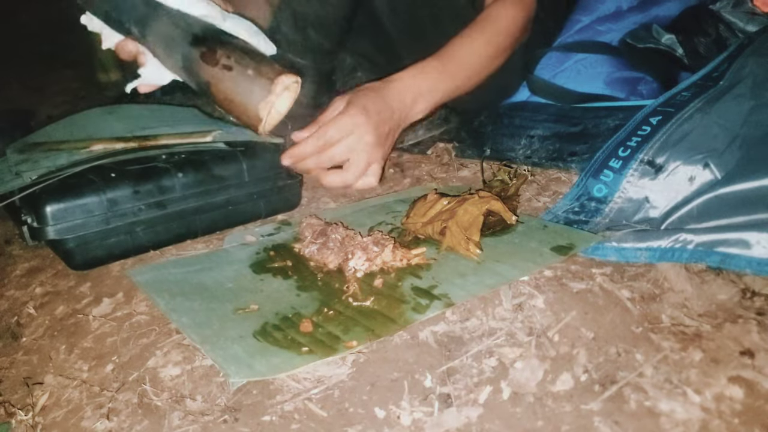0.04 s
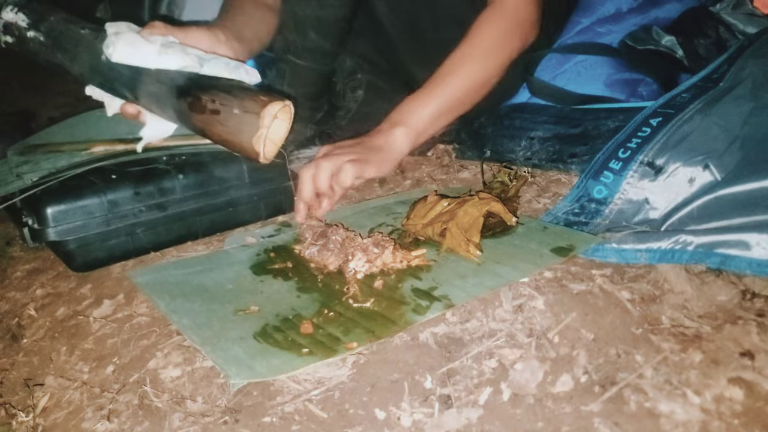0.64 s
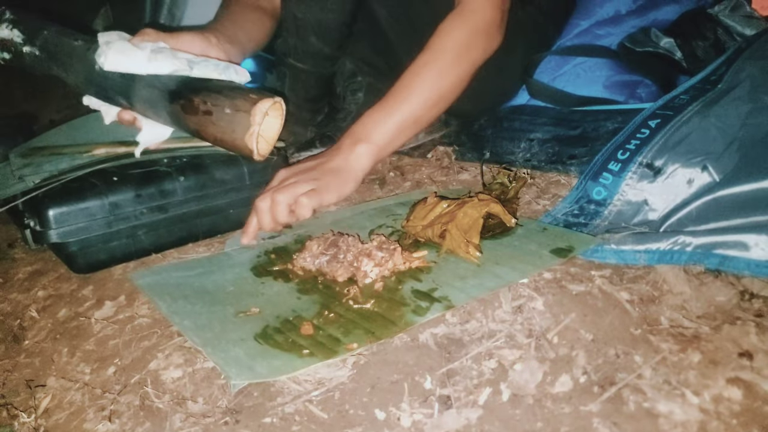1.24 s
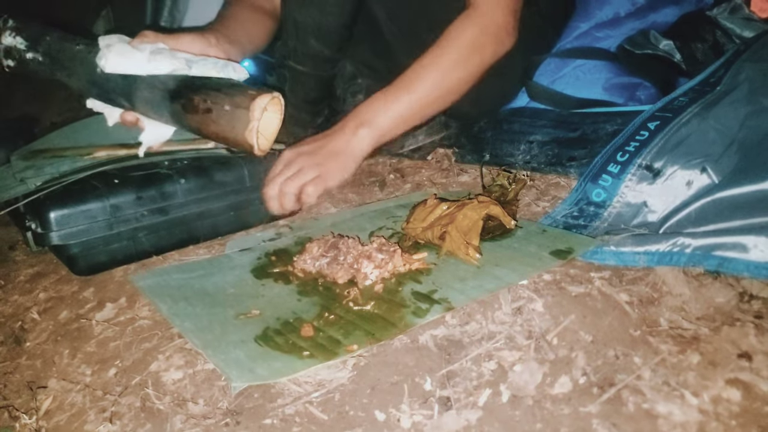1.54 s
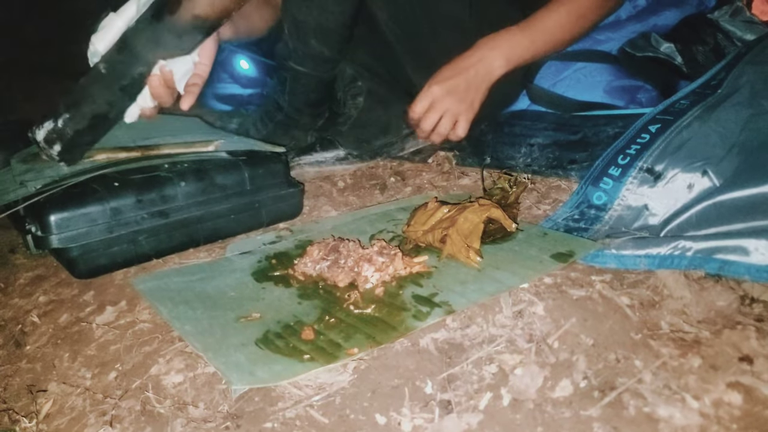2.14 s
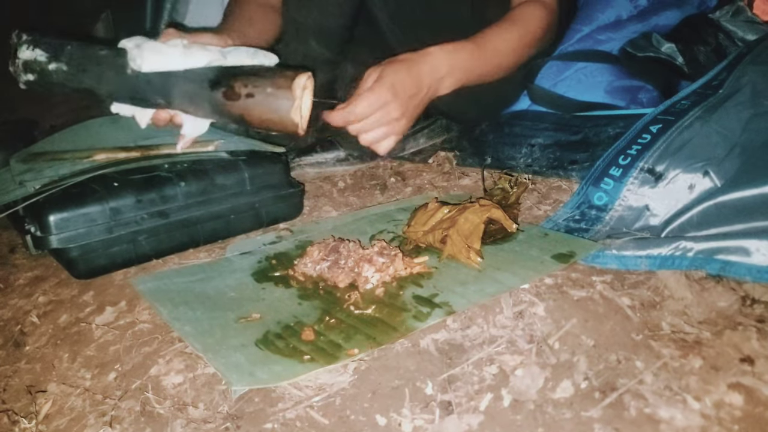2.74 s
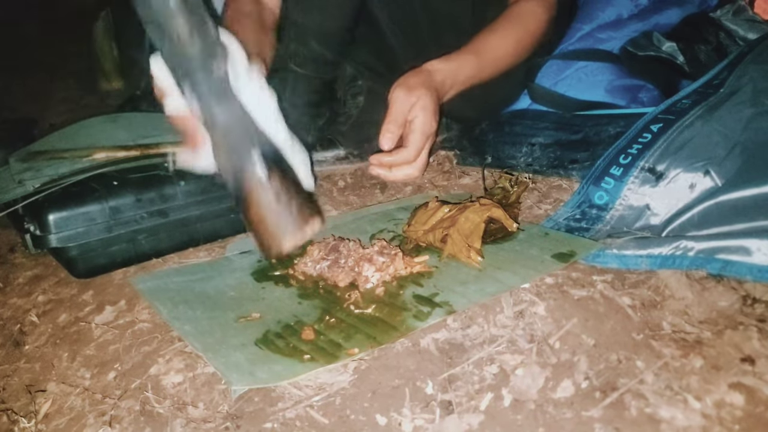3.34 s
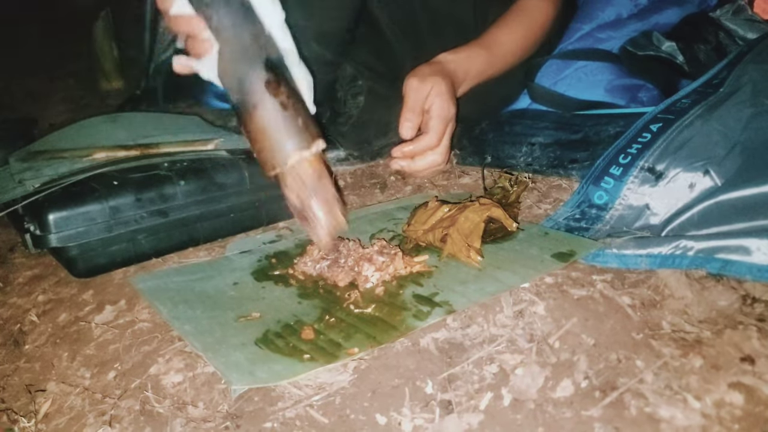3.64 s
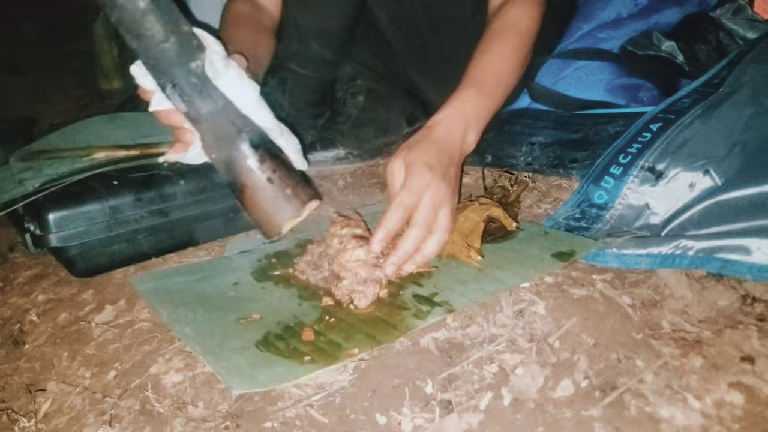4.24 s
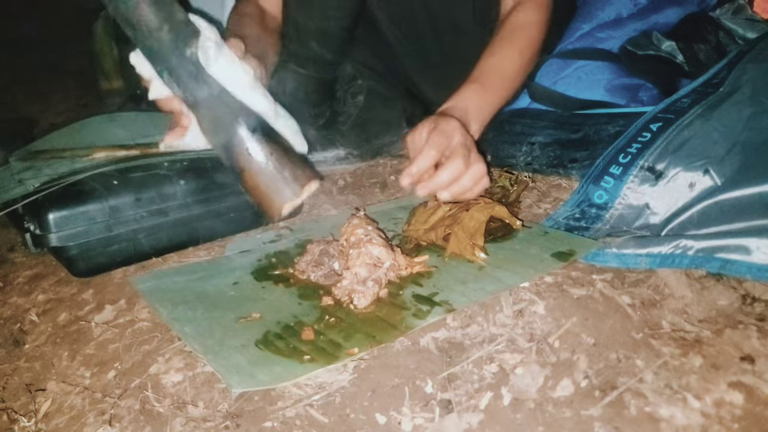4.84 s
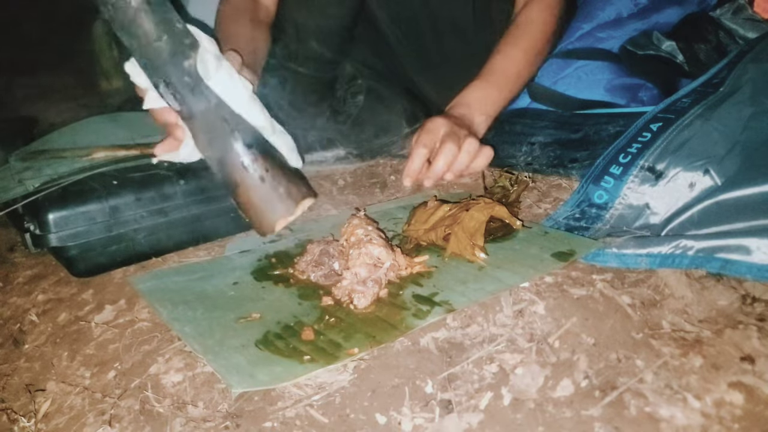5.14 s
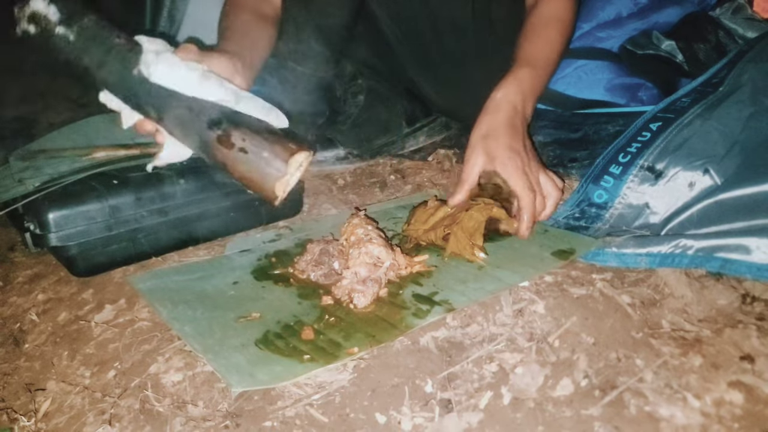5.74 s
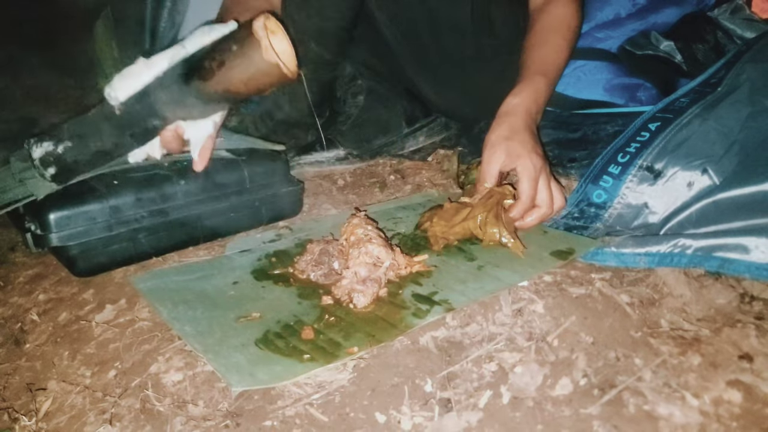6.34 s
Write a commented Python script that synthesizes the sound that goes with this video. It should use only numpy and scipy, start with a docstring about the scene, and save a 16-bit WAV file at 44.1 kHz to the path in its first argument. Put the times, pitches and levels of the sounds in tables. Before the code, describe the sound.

Night insects fill a forest throughout, over a faint low rumble. A near cricket is the main sound, chirping about three times a second, each chirp falling in pitch with a short echo. Behind it are distant trills, a high raspy cricket and a buzz that swells near 0.5, 2.4, 4.4 and 6.5 seconds. Close in front, a bamboo tube clicks at 0.8 seconds, followed by faint ticks, hollow knocks and leaf rustles until about 2 seconds. Around 3.6 seconds moist food scrapes softly down the tube, then flops onto a leaf at 3.8 with a small thud, a wet squelch and a few clicks. A second high cricket answers three times between 4.1 and 5 seconds. The sharpest bamboo snap comes at 4.6 seconds. Light rustles, knocks and a tick follow from 5.6 to 6.4 seconds as the insects continue.

```python
"""Night in a forest. From the start, over a low rumble, far insects chirp and trill by scraping their wings.
A high cricket joins them, a buzzer swells every two seconds, and a near cricket chirps about three times
a second, each chirp falling in pitch. Soon hands tick on a bamboo tube, rustle a leaf and knock the tube.
Past halfway, cooked food slides out of the tube and flops onto the leaf. Then a second high cricket
answers briefly, the sharpest tick snaps, and the insects sing on."""
import sys
import numpy as np
from scipy import signal
from scipy.fft import rfft, irfft, next_fast_len
from scipy.io import wavfile
from scipy.ndimage import map_coordinates

SR = 44100
rng = np.random.default_rng(int(sys.argv[2]) if len(sys.argv) > 2 else 0)


def persist_wave(psi):
    """Save psi, clipped to +-1, as 16-bit WAV."""
    counts = np.round(np.clip(psi, -1, 1) * 32767).astype(np.int16)
    wavfile.write(sys.argv[1], SR, np.atleast_2d(counts).T)


N = 286209
TIME = np.arange(N) / SR


def amp(db):
    """Turn decibels into a number to multiply a sound by."""
    return 10 ** (np.asarray(db) / 20)


def unit(x):
    """Scale a sound to an average strength (rms) of 1."""
    return x / np.sqrt(np.mean(x ** 2) + 1e-20)


def along(points, hz):
    """Read between (pitch_hz, value) points on a logarithmic pitch scale."""
    pitches, values = np.transpose(points)
    return np.interp(np.log(hz + 1), np.log(pitches + 1), values)


def curve(rows):
    """Join (time_s, value) points with straight lines."""
    return np.interp(TIME, *np.transpose(rows))


def wobble(rate):
    """A smooth random curve through rate points a second."""
    return map_coordinates(rng.standard_normal(int(N * rate / SR) + 4), [TIME * rate])


def humps(rows):
    """Bell-shaped swells, one for each (peak_s, width_s, level_db) row."""
    return sum(amp(db) * np.exp(-.5 * ((TIME - s) / width) ** 2) for s, width, db in rows)


def gesture(start_s, attack_s, hold_s, fade_s):
    """A loudness curve that rises until start_s, holds, then drops 60 dB every fade_s."""
    rise = np.exp(np.minimum(TIME - start_s, 0) / attack_s)
    return rise * amp(-60 * np.maximum(TIME - start_s - hold_s, 0) / fade_s)


def beats(first_s, gap_s, count):
    """Evenly spaced times."""
    return first_s + gap_s * np.arange(count)


def filtered(x, response):
    """Multiply each frequency in a sound by response(hz)."""
    size = next_fast_len(N + SR // 2)
    return irfft(rfft(x, size) * response(np.fft.rfftfreq(size, 1 / SR)), size)[..., :N]


def noise(spectrum):
    """Two unrelated noises, shaped by (pitch_hz, level_db) points, at strength 1."""
    return unit(filtered(rng.standard_normal((2, N)), lambda hz: amp(along(spectrum, hz))))


def tone(hz):
    """A pure tone of strength 1 that follows a pitch curve."""
    return np.sqrt(2) * np.sin(2 * np.pi * np.cumsum(hz) / SR)


def add(track, start_s, sound):
    """Mix a sound into a track at the given time."""
    start = round(start_s * SR)
    part = sound[..., max(-start, 0):max(N - start, 0)]
    track[..., max(start, 0):max(start, 0) + part.shape[-1]] += part


def panned(x, pan_db):
    """Make the left side pan_db louder than the right."""
    return x * amp([[pan_db / 2], [-pan_db / 2]])


def night_air(level_db=-72, flutter_db=.6):
    """A low rumble, alike in both ears, and a faint fluttering hiss."""
    # tone colour of the air: pitch_hz, level_db
    colour = [(20, -19.5), (40, -5), (75, 2.5), (120, 2), (250, -10), (500, -12), (1300, -11.5),
              (3500, -20), (5200, -23.5), (8500, -37.5), (10500, -24), (13000, -19.5), (15500, -14.5),
              (16000, -23)]
    # how alike the two ears are: pitch_hz, likeness (1 is the same)
    likeness = [(60, 0.98), (250, 0), (1000, 0), (12000, 0.027)]
    # slow drift in loudness: time_s, change_db
    drift = [(0, 2.5), (5.2, -0.94), (6.4, 2)]
    angle = lambda hz: np.arccos(np.clip(along(likeness, hz), -1, 1)) / 2
    shared, side = filtered(noise(colour), lambda hz: np.array([np.cos(angle(hz)), np.sin(angle(hz))]))
    loudness = amp(level_db + curve(drift) + flutter_db * wobble(20))
    return loudness * unit(np.array([shared + side, shared - side]))


def insect_wash(level_db=-66.5):
    """The farthest insects merge into one steady hiss."""
    # tone colour of the hiss: pitch_hz, level_db
    colour = [(1200, -41), (1700, -19.5), (1900, -7), (2150, 2.5), (2450, -1.5), (2600, -11.5), (2850, -5),
              (3050, -11.5), (3250, -30), (4000, -49)]
    return amp(level_db) * noise(colour)


def trees():
    """The stereo echo of one click bouncing among the trunks."""
    # time the echo takes to drop 60 dB: pitch_hz, fade_s
    fades = [(500, 0.24), (2200, 0.93), (6500, 0.99), (14000, 0.16)]
    hz, t, spectrum = signal.stft(rng.standard_normal((2, int(SR * .6))), SR, nperseg=256)
    fade_s = along(fades, hz)[:, None]
    echo = signal.istft(spectrum * amp(-60 * t / fade_s) / np.sqrt(fade_s), SR, nperseg=256)[1]
    return echo / np.linalg.norm(echo[0])


def distant(song):
    """An endless song heard only through the trees, at strength 1."""
    looped = song * signal.windows.tukey(N, .003)
    return unit(irfft(rfft(looped, N) * rfft(trees(), N), N))


def scattered(call):
    """The forest's echo of a call, with as much energy as the call."""
    echo = signal.fftconvolve(call[None], trees(), axes=1)
    return echo * np.linalg.norm(call) / np.linalg.norm(echo[0])


def stroke(end_hz, glide_hz, settle_s, length_s, rise_s, fall_s):
    """One wing scrapes the other's teeth; as its speed settles, the pitch glides to end_hz."""
    t = np.arange(int(length_s * SR)) / SR
    fade_in = np.sin(np.pi / 2 * np.minimum(t / rise_s, 1))
    fade_out = np.sin(np.pi / 2 * np.minimum((length_s - t) / fall_s, 1))
    glide = glide_hz * np.exp(-(t / settle_s) ** 1.6)
    return (fade_in * fade_out) ** 2 * tone(end_hz + glide)


def cricket_group(pitch_hz, spread_hz, glide_hz, level_db, count):
    """Far crickets, each with its own pitch and pace."""
    out = np.zeros((2, N))
    for end_hz in pitch_hz + spread_hz * np.linspace(-1, 1, count):
        song = np.zeros(N)
        gap_s = rng.uniform(.24, .36)
        for s in np.arange(-rng.uniform(0, gap_s), N / SR, gap_s):
            start_s = s + rng.normal(0, .02)
            hz = end_hz + rng.normal(0, 3.85)
            chirp = stroke(hz, glide_hz, settle_s=.02402, length_s=.075, rise_s=.019, fall_s=.023)
            add(song, start_s, chirp)
        out += distant(song)
    return amp(level_db) * unit(out)


def far_chorus():
    """Three groups of far crickets: two drift in loudness together, one stays steady."""
    # gain of the two drifting groups: time_s, gain_db
    drift = [(0, -48.5), (.95, -51.3), (1.7, -50), (4.1, -49), (5.7, -49.5), (6.15, -51.5), (6.49, -47)]
    drifting = cricket_group(pitch_hz=2083, spread_hz=81.7, glide_hz=229.4, level_db=7, count=10)
    drifting += cricket_group(pitch_hz=1953, spread_hz=65, glide_hz=176, level_db=-12.5, count=6)
    steady = cricket_group(pitch_hz=2111, spread_hz=7.66, glide_hz=160.7, level_db=-49, count=3)
    return drifting * amp(curve(drift)) + steady


def trill(pitch_hz, spread_hz, sweep_hz, per_s, level_db, count):
    """Far insects make quick, even wing strokes, each sweeping down in pitch."""
    out = np.zeros((2, N))
    for _ in range(count):
        pace = per_s * (1 + .03 * wobble(2))
        cycle = (np.cumsum(pace) / SR + rng.random()) % 1  # runs from 0 to 1 in each stroke
        pitch = pitch_hz + spread_hz * wobble(40) + sweep_hz * (.5 - cycle)
        song = unit(np.sin(np.pi * cycle) ** 4 * tone(pitch))
        out += distant(song) + .23 * song
    return amp(level_db) * unit(out)


def far_trills():
    """Five pairs of trilling insects; the highest pair grows louder in regular bouts."""
    bouts = 1 + humps([(s, .17, 2.5) for s in beats(first_s=.43, gap_s=2.72, count=3)])
    out = trill(pitch_hz=2875, spread_hz=45, sweep_hz=411, per_s=15, level_db=-61, count=2)
    out += trill(pitch_hz=2861, spread_hz=55, sweep_hz=420, per_s=10, level_db=-63, count=2)
    out += bouts * trill(pitch_hz=6236, spread_hz=70, sweep_hz=401, per_s=9.1, level_db=-71.5, count=2)
    out += trill(pitch_hz=5974, spread_hz=170, sweep_hz=590, per_s=33, level_db=-75, count=2)
    out += trill(pitch_hz=4374, spread_hz=180, sweep_hz=726, per_s=51, level_db=-76.5, count=2)
    return out


def high_cricket(starts, pitch_hz, level_db, echo_db=-1, pan_db=-1, rasp=.7):
    """Short, raspy, rising chirps, blurred by near leaves and trailing off among the trees."""
    song = np.zeros(N)
    for start_s in starts:
        hz = pitch_hz + rng.normal(0, 15)
        chirp = stroke(hz, glide_hz=-200, settle_s=.022, length_s=.082, rise_s=.005, fall_s=.045)
        add(song, start_s, chirp)
    song = amp(level_db) * song * (1 + rasp * wobble(520))  # uneven wing teeth roughen the tone
    t = np.arange(SR // 20) / SR
    leaves = rng.standard_normal((2, len(t))) * amp(-60 * t / .033)
    out = np.std(song) * unit(signal.fftconvolve(song[None], leaves, axes=1)[:, :N])
    add(out, .006, amp(echo_db) * scattered(song))
    return panned(out, pan_db)


def high_pair():
    """One high cricket chirps throughout; a slightly lower one answers three times in its gaps."""
    # the first cricket's chirps: start_s
    starts = [0.0, 0.32, 0.672, 1.063, 1.465, 1.808, 2.136, 2.49, 2.874, 3.248, 3.698, 4.024, 4.355, 4.716,
              5.024, 5.62, 5.98, 6.06]
    caller = high_cricket(starts, pitch_hz=6480, level_db=-62)
    answer = high_cricket(beats(first_s=4.15, gap_s=.36, count=3), pitch_hz=6330, level_db=-65)
    return caller + answer


def buzzer(ring_hz=4425, climb_hz_per_s=330, width_hz=150, level_db=-61, echo_db=-10, pan_db=-4):
    """A fast, wavering buzz climbs in pitch and swells as it crosses the note the wing rings at."""
    # tops of the swells: peak_s
    peaks = [.53, 2.41, 4.44, 6.53]
    song = np.zeros(N)
    for peak_s in peaks:
        t = TIME - peak_s
        strong_middle = .5 * np.exp(-.5 * (t / .15) ** 2)
        long_run = .45 * np.exp(-.5 * ((t + .12) / .55) ** 2)
        pulses = 1 + .45 * np.sin(2 * np.pi * 55 * TIME + .7 * wobble(8))
        pitch = ring_hz + climb_hz_per_s * np.clip(t, -.45, .6) + 36 * wobble(120)
        song += amp(level_db) * (strong_middle + long_run) * pulses * tone(pitch)
    wing = filtered(song, lambda hz: 1 / (1 + 2j * (hz - ring_hz) / width_hz))
    direct = wing * (.59 + .25 * np.array([wobble(60), wobble(60)]))  # flickers in each ear
    return panned(direct + amp(echo_db) * scattered(wing)[:, :N], pan_db)


def near_cricket(pitch_hz=2138, level_db=-38.1, echo_db=-8, lead_s=.005, pan_db=1.5):
    """Falling chirps arrive by a few paths, followed by the forest's echo."""
    # the chirps: start_s
    starts = [0.204, 0.556, 1.047, 1.313, 1.758, 2.067, 2.377, 2.688, 3.033, 3.334, 3.657, 3.97, 4.273,
              4.556, 4.989, 5.329, 5.607, 5.905, 6.334]
    # paths, straight and off the ground and trunks: delay_s, left_db, right_db
    paths = [(0, -10, 5), (.0068, -5.5, -14.5), (.015, -6.5, -17.5), (.023, -3, -18.5), (.031, -8.5, -16.5),
             (.05, -17, -11.5), (.115, -14.5, -17)]
    out = np.zeros((2, N))
    for start_s in starts:
        hz = pitch_hz + rng.normal(0, 4)
        chirp = stroke(hz, glide_hz=325, settle_s=.024, length_s=.076, rise_s=.019, fall_s=.022)
        chirp *= amp(level_db + rng.normal(0, .2))
        for delay_s, left_db, right_db in paths:
            arrival_s = start_s - lead_s + delay_s + rng.normal(0, .00007)
            add(out, arrival_s, amp([[left_db], [right_db]]) * chirp)
        add(out, start_s + .01, amp(echo_db) * scattered(chirp))
    return panned(out, pan_db)


def bamboo_ticks(snap_db=2, early_db=-15, early_fade_s=.019, late_db=-26, late_fade_s=.064):
    """Bamboo and fingers make sharp snaps that bounce briefly off the ground and nearby things."""
    # the snaps: start_s, level_db (before colouring), pan_db (plus is left)
    snaps = [(0.7835, -36.5, 6), (1.2705, -58, -2), (1.4133, -56.5, 10.5), (1.497, -52.5, 10),
             (3.442, -56, -8.5), (3.8234, -43, -3), (3.8355, -40.5, 0), (3.8811, -42, 3),
             (4.0038, -55.5, -6), (4.2502, -56, 9), (4.6003, -30.5, -7), (4.6444, -16.5, 2),
             (4.785, -55.5, 11.5), (6.351, -45.5, -2)]
    # tone colour of a snap: pitch_hz, gain_db
    colour = [(300, -28.5), (1500, -18.5), (3500, -12), (6500, -4), (9000, -5), (12000, 4.5), (14000, 3.5),
              (15500, 2.5), (17000, -11)]
    out = np.zeros((2, N))
    t = np.arange(SR // 10) / SR
    fade = amp(early_db - 60 * t / early_fade_s) + amp(late_db - 60 * t / late_fade_s)
    for start_s, level_db, pan_db in snaps:
        tick = fade * rng.standard_normal((2, len(t)))
        tick[:, 0] += amp(snap_db)
        add(out, start_s + .00077, panned(amp(level_db) * tick, pan_db))
    return filtered(out, lambda hz: amp(along(colour, hz)))


def crackle(per_s, spread_db, rubbing, lumps_db=2.5):
    """Tiny snaps of leaf and moist food, in uneven clumps over a soft rubbing, at strength 1."""
    # tone colour of the crackle: pitch_hz, level_db
    colour = [(200, -4.5), (1200, 0.5), (3500, 0.5), (7500, 0), (10000, -0.5), (13000, 1.5), (15500, 2),
              (16200, -13)]
    hits = rng.random(N) < per_s / SR
    snaps = hits * amp(spread_db * rng.standard_normal(N).clip(-2.5, 2.5))
    decay = np.exp(-1 / (.0004 * SR))  # gives each snap a very short tail
    bursts = np.sqrt(signal.lfilter([1], [1, -decay], snaps ** 2))
    return unit((unit(bursts) + rubbing) * amp(lumps_db * wobble(90)) * noise(colour))


def leaf_rustles(gain_db=1.65, pan_db=2):
    """Each touch of the hand on leaf and food is a brief swell of crackle."""
    # the touches: peak_s, width_s, level_db (before gain_db)
    touches = [(.92, .02, -71), (1.02, .07, -70.5), (1.28, .012, -69), (1.565, .027, -68), (2.08, .03, -74),
               (4.65, .035, -67.5), (5.64, .018, -73), (5.9, .045, -72.5), (6.36, .023, -66)]
    grain = crackle(per_s=520, spread_db=4.5, rubbing=.65)
    return panned(amp(gain_db) * humps(touches) * grain, pan_db)


def tube_knocks(gain_db=-8, fade_s=.16, attack_s=.005, sharpness=12):
    """The air inside the bamboo rings briefly at each knock."""
    # hollow knocks: start_s, level_db (before gain_db), pitch_hz
    knocks = [(0.972, -52, 942), (1.57, -58.5, 1200), (3.814, -43.5, 1190), (4.591, -47, 1710),
              (5.872, -55, 905), (6.205, -56, 1290)]
    out = np.zeros((2, N))
    t = np.arange(SR // 4) / SR
    shape = (1 - np.exp(-t / attack_s)) * amp(-60 * t / fade_s)
    for start_s, level_db, pitch_hz in knocks:
        ring = signal.lfilter(*signal.iirpeak(pitch_hz, sharpness, SR), rng.standard_normal((2, len(t))))
        add(out, start_s, amp(level_db + gain_db) * shape * unit(ring))
    return out


def neighbour_crickets(echo_db=-4):
    """Now and then another cricket stands out of the chorus."""
    # single chirps: start_s, end_pitch_hz, level_db
    calls = [(1.405, 2222, -36.5), (1.62, 2027, -45.5), (5.21, 2012, -46), (5.5, 2010, -44),
             (6.0, 2008, -48)]
    out = np.zeros((2, N))
    for start_s, end_hz, level_db in calls:
        chirp = stroke(end_hz, glide_hz=70.1, settle_s=.02, length_s=.07, rise_s=.03, fall_s=.018)
        chirp *= amp(level_db)
        add(out, start_s, chirp)
        add(out, start_s, amp(echo_db) * scattered(chirp))
    return out


def food_slide(middle_s=3.575, width_s=.064, middle_hz=905, climb_hz_per_s=4000,
               hollow_db=-70.5, scrape_db=-72):
    """Food scrapes down the tube in uneven gulps, and the air inside sounds a rising note."""
    push = np.exp(-.5 * ((TIME - middle_s) / (1.3 * width_s)) ** 4)
    note = tone(middle_hz + climb_hz_per_s * (TIME - middle_s))
    rough_note = note * np.array([wobble(420), wobble(420)])
    gulps = amp(wobble(45))
    gurgle = amp(hollow_db) * push * unit(rough_note * gulps)
    scrape = humps([(middle_s + .01, width_s, scrape_db)]) * crackle(per_s=600, spread_db=3.5, rubbing=.7)
    return gurgle + scrape


def food_landing(touch_s=3.7, flop_s=3.823, touch_db=-67.5, thud_db=-64.5,
                 squelch_db=-55.5, settle_db=-77):
    """The lump touches the leaf, flops down with a thud and a wet squelch, then ticks as it settles."""
    # tone colour of the soft thud: pitch_hz, level_db
    colour = [(25, -7), (70, 0), (150, -5), (350, -6), (700, -19.5), (1500, -14.5), (4000, -56.5)]
    touch = gesture(touch_s, attack_s=.01, hold_s=flop_s - touch_s, fade_s=.13)
    flop = gesture(flop_s, attack_s=.01, hold_s=.055, fade_s=.13)
    settle = gesture(flop_s, attack_s=.054, hold_s=.23, fade_s=1.4)
    lumpy_noise = unit(amp(3.5 * wobble(70)) * noise(colour))
    thud = (amp(touch_db) * touch + amp(thud_db) * flop) * lumpy_noise
    squelch = amp(squelch_db) * flop * crackle(per_s=1200, spread_db=3.5, rubbing=.6)
    faint_ticks = amp(settle_db) * settle * crackle(per_s=66, spread_db=5.5, rubbing=.3)
    return thud + panned(squelch + faint_ticks, pan_db=1)


def scene():
    """Insects all around, the meal in front."""
    insects = far_chorus() + far_trills() + high_pair()
    insects += near_cricket() + neighbour_crickets() + buzzer() + insect_wash()
    meal = bamboo_ticks() + leaf_rustles() + tube_knocks() + food_slide() + food_landing()
    return insects + meal + night_air()


def record(dry, top_hz=16500):
    """Cut away the very highest treble."""
    return filtered(dry, lambda hz: hz < top_hz)


dry = scene()
out = record(dry)
persist_wave(out)
```